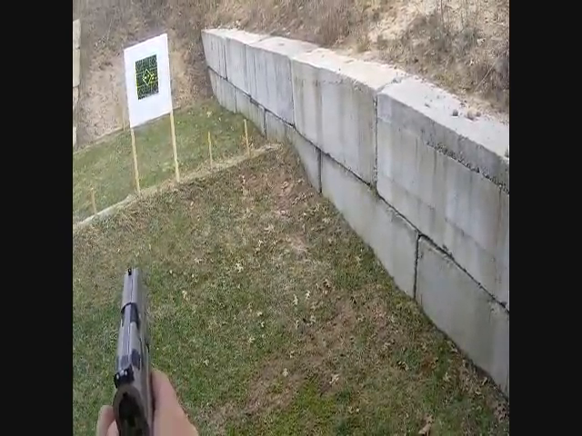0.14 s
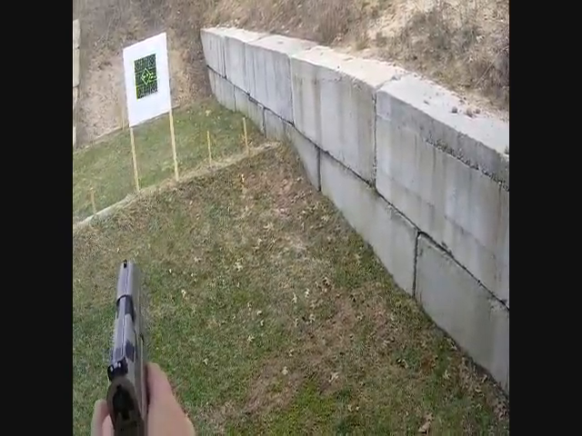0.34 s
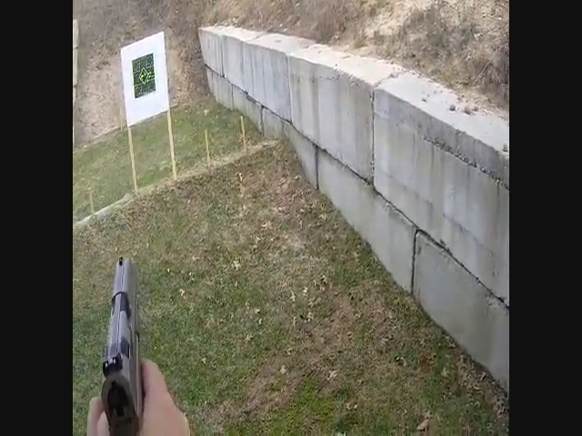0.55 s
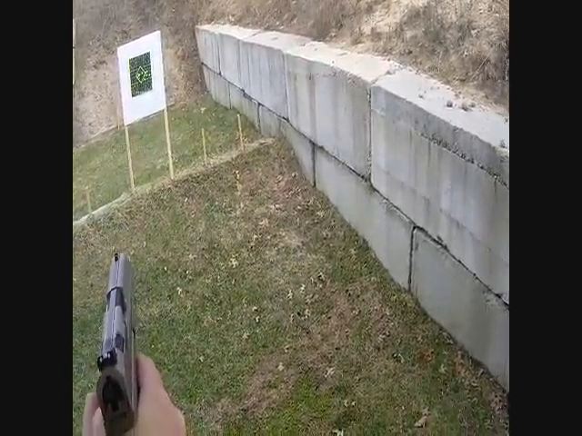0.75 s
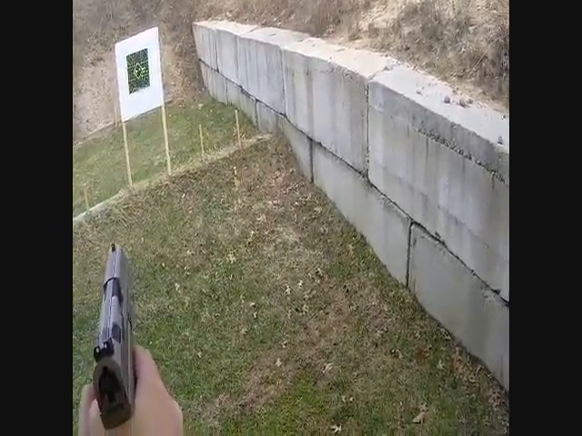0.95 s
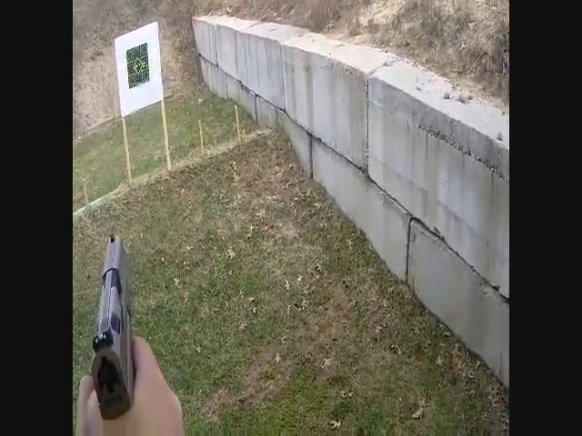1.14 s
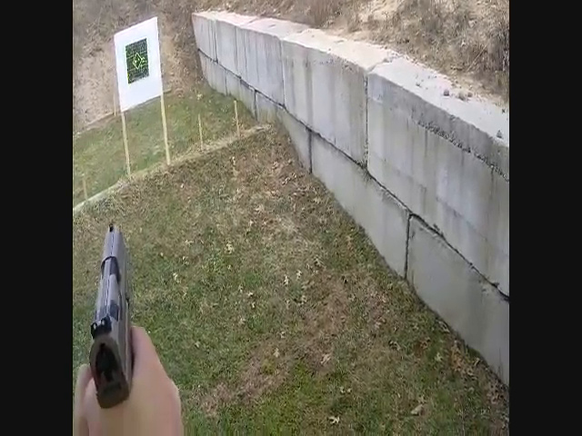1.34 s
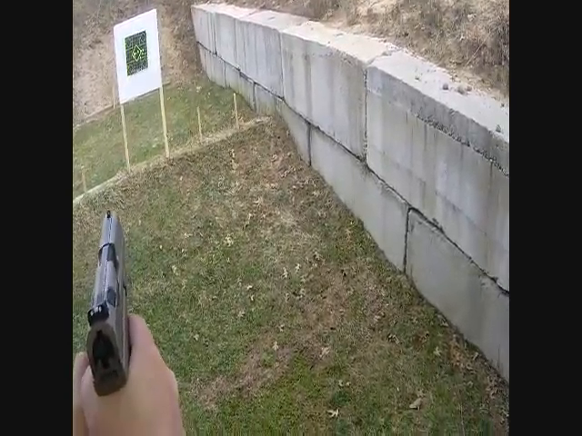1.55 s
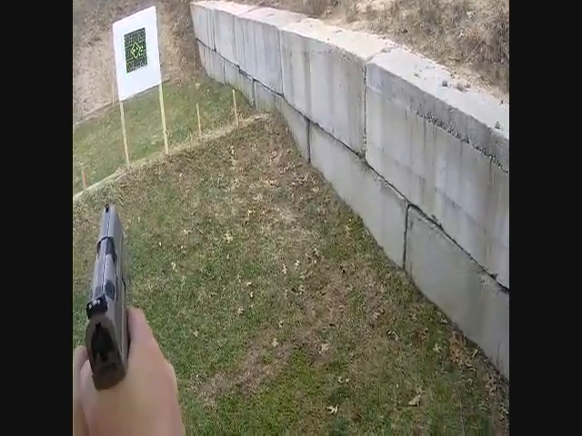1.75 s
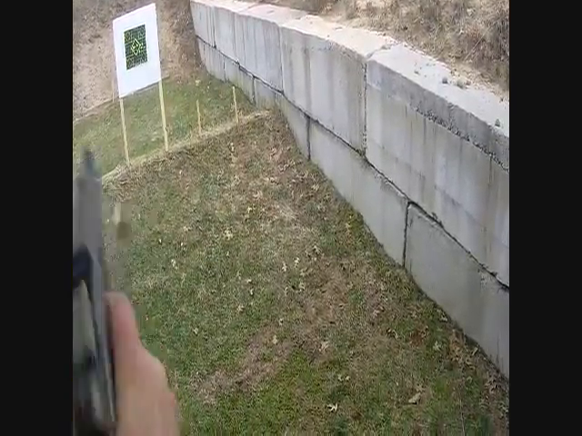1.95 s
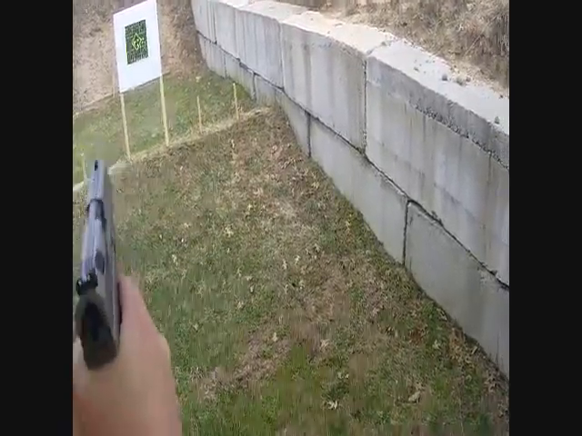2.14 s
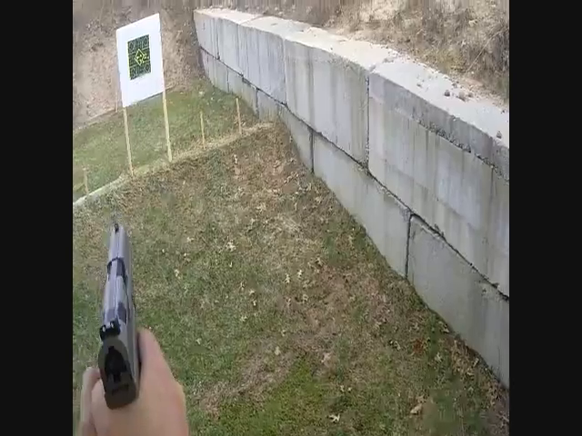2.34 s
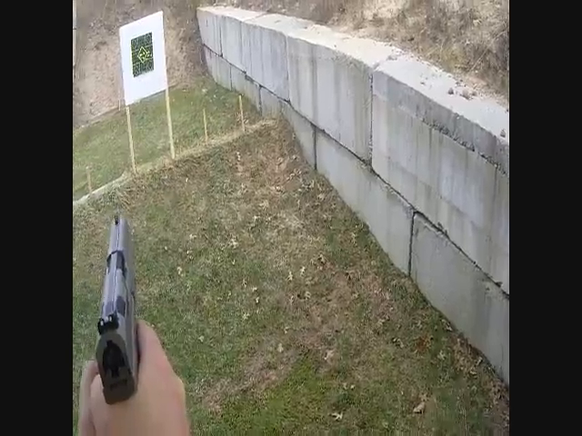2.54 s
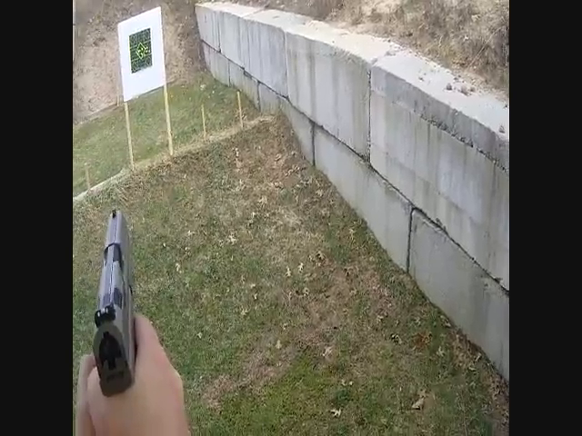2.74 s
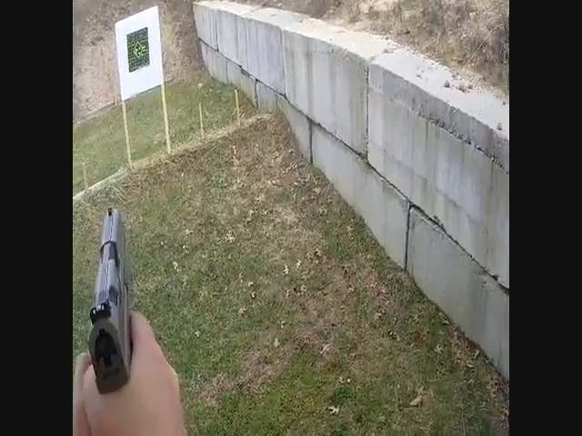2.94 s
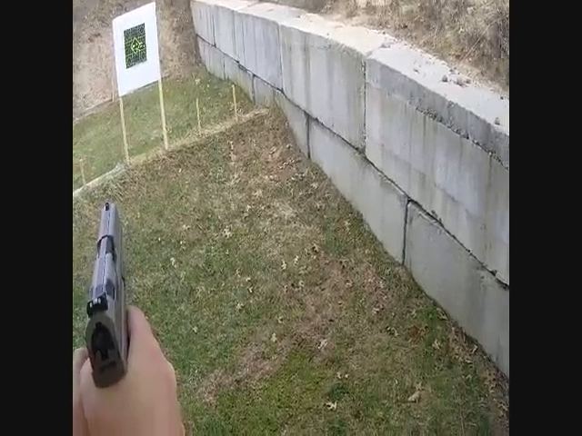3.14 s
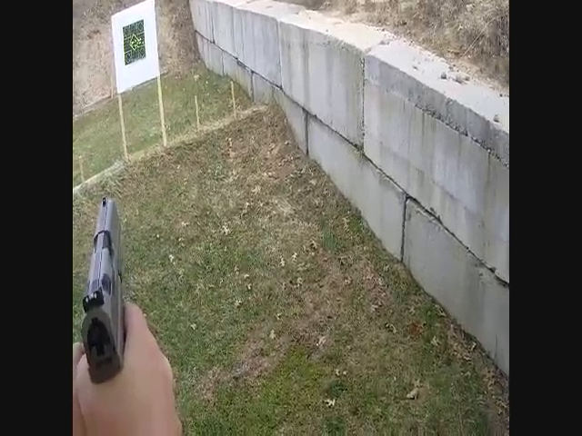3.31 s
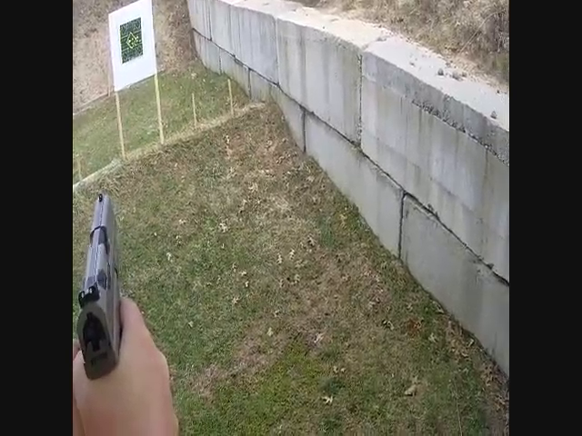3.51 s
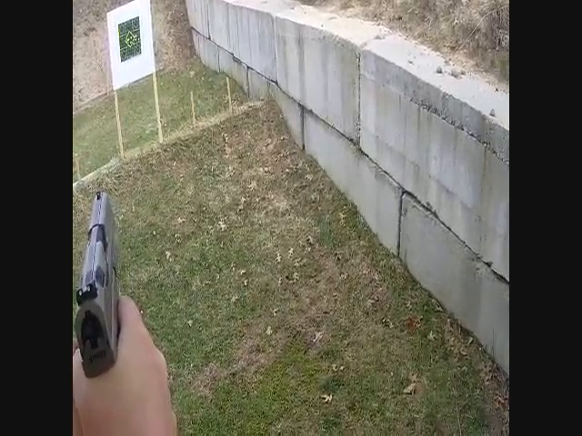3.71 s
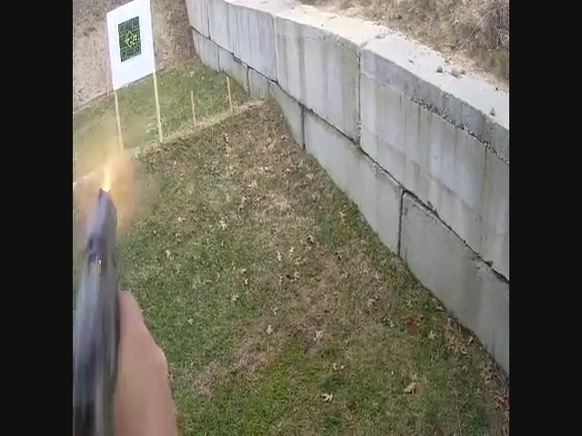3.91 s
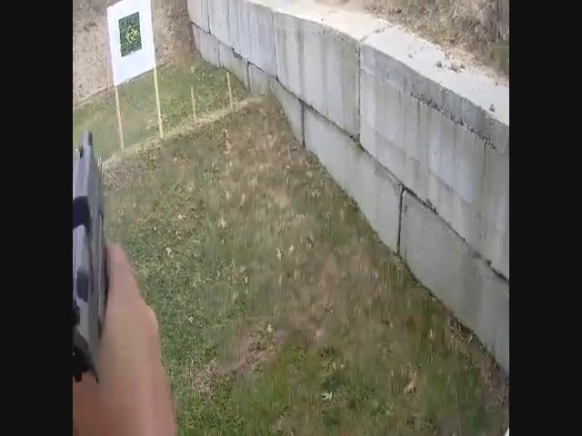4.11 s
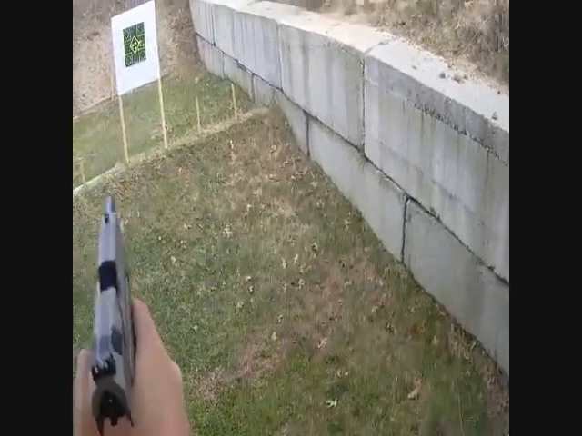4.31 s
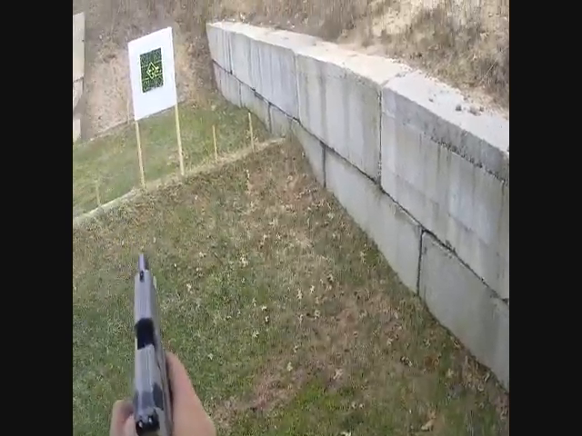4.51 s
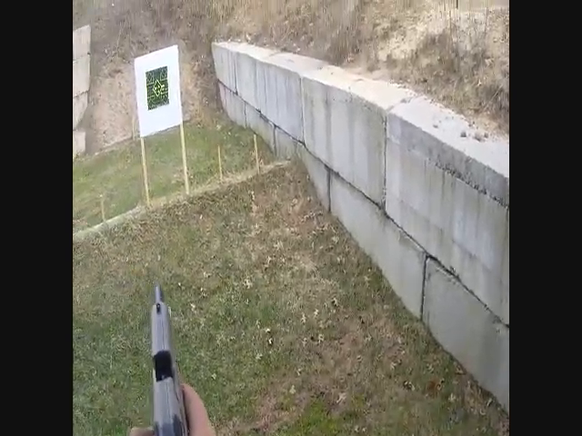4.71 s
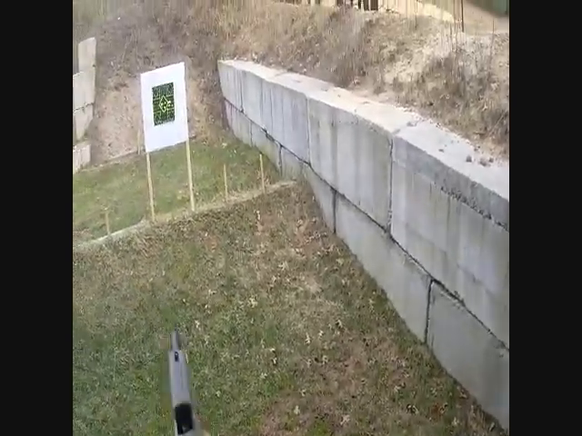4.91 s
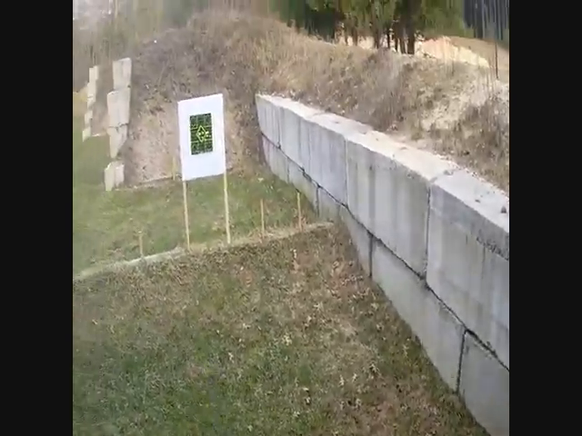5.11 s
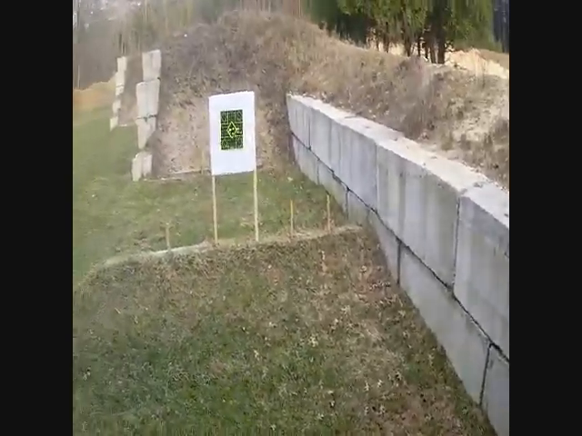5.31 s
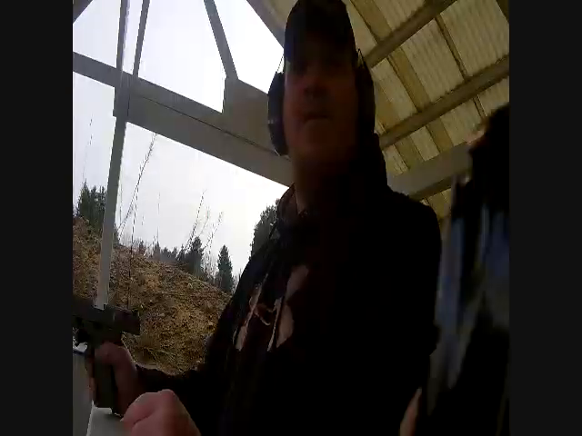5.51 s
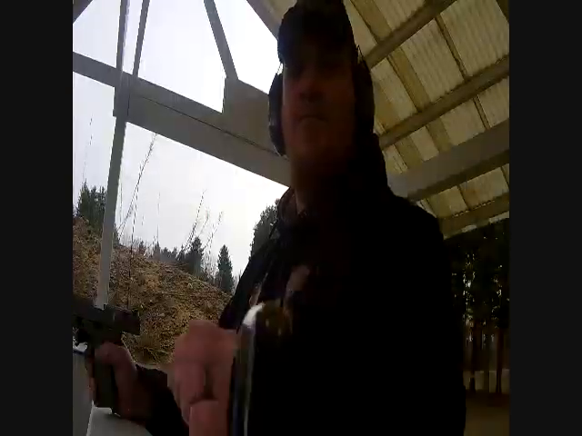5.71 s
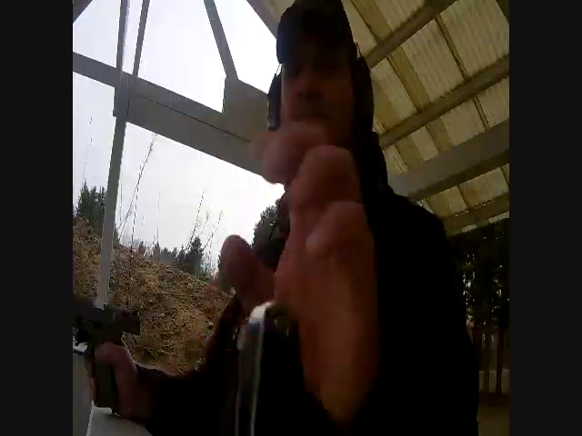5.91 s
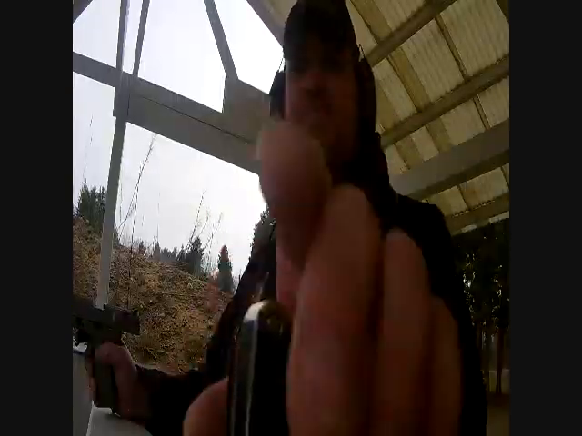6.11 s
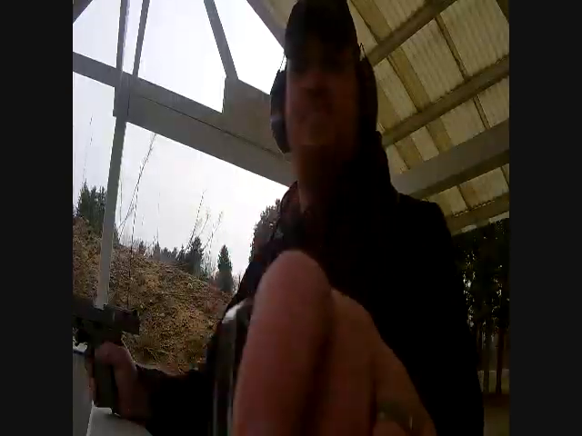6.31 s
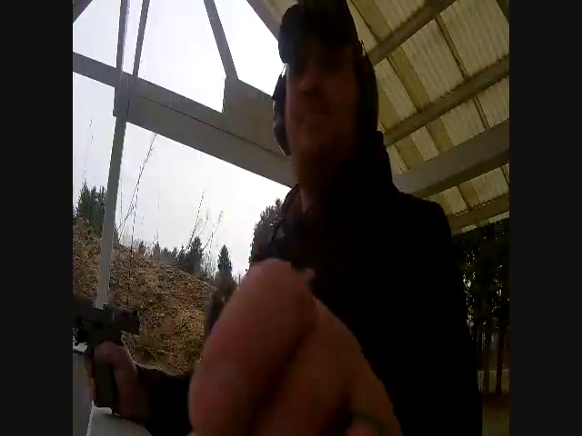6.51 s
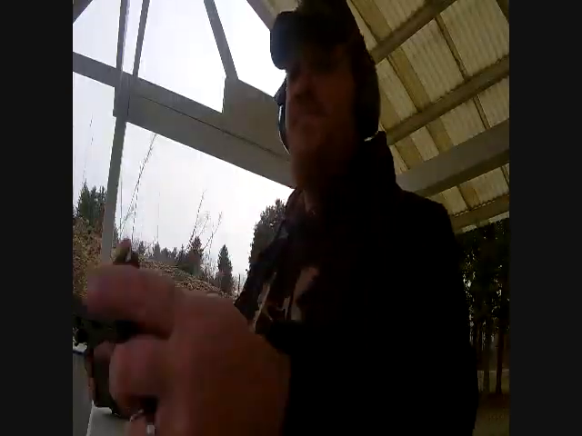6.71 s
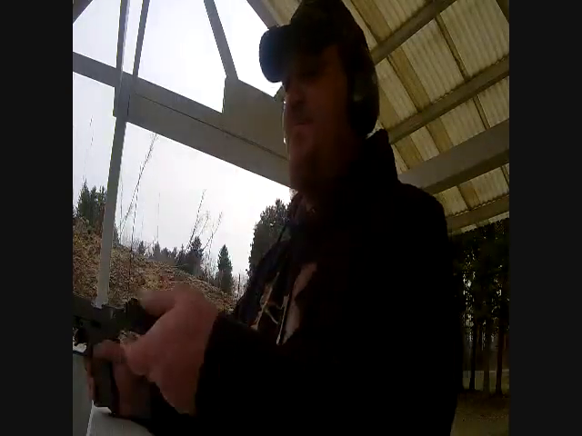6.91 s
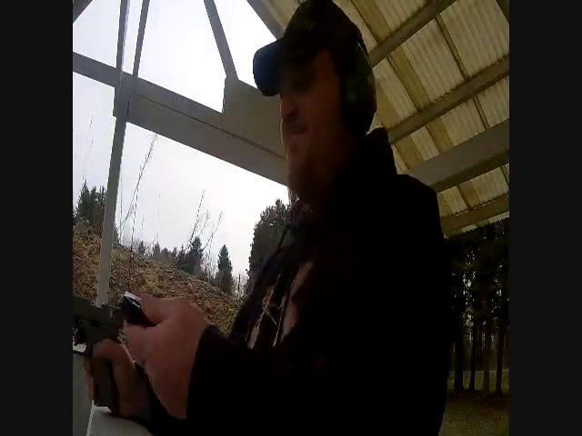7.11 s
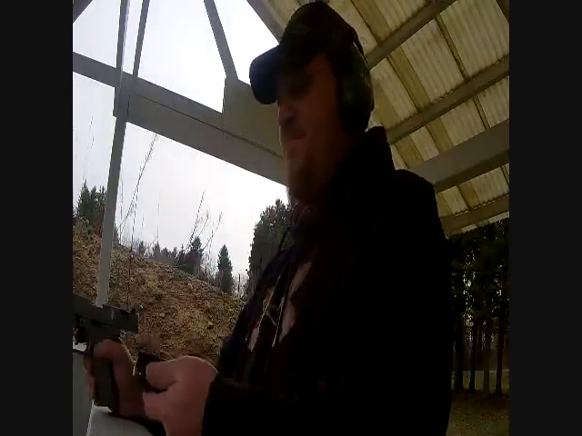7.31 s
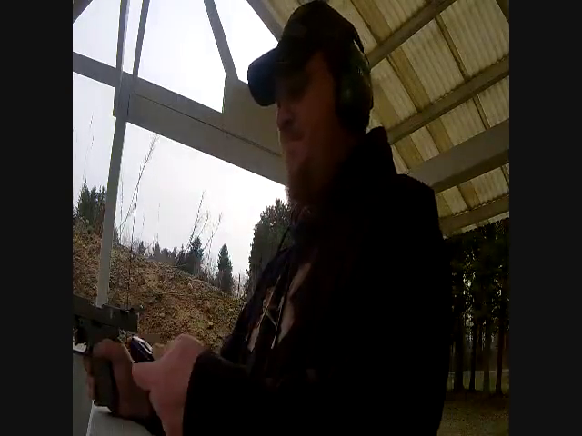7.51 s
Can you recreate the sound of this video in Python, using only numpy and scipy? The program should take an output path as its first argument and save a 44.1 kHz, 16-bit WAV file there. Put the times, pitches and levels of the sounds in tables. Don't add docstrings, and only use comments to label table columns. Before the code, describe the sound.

Steady dull microphone hiss, then a very loud pistol shot, flattened by overload, rattling with boxy ringing between concrete walls and leaving a longer tail off distant banks. A second, near-identical shot follows two seconds later. A spent case tinkles faintly after each. Tiny metal clinks, a sudden close thump through the camera mount, and brief muffled cloth rubs follow before only hiss remains.

```python
import sys
import numpy as np
from scipy import signal
from scipy.fft import rfft, irfft, next_fast_len
from scipy.io import wavfile
from scipy.ndimage import uniform_filter1d, map_coordinates

SR = 44100
rng = np.random.default_rng(int(sys.argv[2]) if len(sys.argv) > 2 else 0)


def bounce(signal):
    frames = np.transpose(np.atleast_2d(signal))
    limited = np.clip(frames, -1, 1)
    pcm = np.round(limited * 32767).astype(np.int16)
    wavfile.write(sys.argv[1], SR, pcm)


def volts_from_db(level):
    exponent = np.asarray(level, float) / 20
    return 10 ** exponent


N = 332955

# start in seconds, blast level in dB.
SHOTS = [
    (2.0279, -3),
    (4.0238, -2.5),
]
# frequency in Hz, time to fall 60 dB in seconds.
NEAR_DECAY = [(100, 0.23), (550, .23), (800, 0.31), (1300, 0.325), (3500, 0.29), (7000, 0.26),
              (15000, 0.18)]
# frequency in Hz, time to fall 60 dB in seconds.
FAR_DECAY = [(100, 1.), (600, 3.3), (1300, 2), (3500, 1.5), (7000, 0.87), (15000, 0.36)]
# frequency in Hz, level in dB.
NEAR_COLOUR = [(25, -2), (150, -4), (600, -5.5), (850, -1.5), (1300, -5), (1900, -4), (2300, -5), (2800, 1),
               (4400, -0.5), (5000, -8.5), (7000, -5.5), (7600, -9.5), (16000, -18.5)]
# frequency in Hz, level in dB.
FAR_COLOUR = [(25, -7.5), (600, -5), (1000, -4.5), (1300, -0.4), (1900, 2.5), (2400, 3), (2800, 4),
              (4500, 3), (5000, -3.5), (7000, -2), (9000, -5), (16000, -17)]
# frequency in Hz, likeness from 0 to 1.
LIKENESS = [(100, .8), (1300, .96), (3000, .7), (7000, .35), (16000, .2)]
# delay after the shot in seconds, level in dB.
SLAPS = [
    (.099, -14),
    (.212, -31),
    (.225, -34),
]
# first path in m, round trip in m, first level in dB, loss per trip in dB.
ROOF_PATH = (2.4, 2.7, 14, .4)
# first path in m, round trip in m, first level in dB, loss per trip in dB.
WALL_PATH = (32, 10.5, -5, 5.8)
# frequency in Hz, width in Hz, level in dB.
HOUSING = [(1095, 32, 9), (1314, 80, 22), (1655, 100, 10), (2650, 180, -2.5), (3040, 160, -0.5),
           (3400, 260, -3.5), (4120, 180, -1.5), (6910, 500, -4), (8440, 400, -2)]
# start in seconds, ring level in dB, tick level in dB.
KNOCKS = [
    (5.747, -28.5, -62),
    (5.7512, -18, -54),
    (5.7572, -21.5, -49),
    (5.772, -31.5, -70),
]
# frequency in Hz, level in dB, time to fall 60 dB in seconds.
MOUNT = [(44, -16, 0.2), (164, 0, 0.042), (267, 0, 0.026), (690, -5, 0.032), (1210, -4.5, 0.028),
         (1650, -13, 0.036), (2680, -24, 0.021), (4160, -27, 0.019), (8700, -28, 0.014)]
# wall ring in Hz, mouth tone in Hz, then its bounces,
# each with start in seconds, ring spread in Hz, ring level in dB, floor click level in dB.
CASES = [
    (10960, 5280, [(2.849, 200, -62, -60), (3.14, 150, -79, -65), (3.6, 30, -76, -85)]),
    (10740, 4400, [(4.853, 280, -62, -53), (5.024, 60, -66, -57.5)]),
]
# share of the ring spread, level in dB.
BRASS = [(-.5, 4), (.1, 0), (.5, 4.5)]
# frequency in Hz, sharpness (Q), level in dB.
FLOOR = [(3500, 2.5, 1.5), (4500, 4, -1.5), (5300, 4, -1.5)]
# start in seconds, frequency in Hz, level in dB, time to fall 60 dB in seconds.
PARTS = [
    (5.416, 10780, -61, .13),
    (5.418, 13010, -68, .1),
    (5.48, 3950, -62, .1),
    (5.537, 3150, -57, .13),
    (5.578, 4300, -58, .11),
    (5.575, 8700, -66, .15),
    (5.6, 9000, -65, .12),
    (5.6, 3080, -58, .13),
]
# start in seconds, held time in seconds, level in dB.
STROKES = [
    (5.58, .01, -58),
    (5.775, .045, -50),
    (5.86, .03, -52),
    (6.0, .04, -62),
    (6.38, .12, -63),
    (6.52, .13, -59),
]
# frequency in Hz, level in dB.
CLOTH = [(200, -30), (900, -7.5), (1400, 3), (1900, -11), (3000, -26), (16000, -49.5)]
# frequency in Hz, level in dB per Hz.
HISS = [(12, -32.5), (20, -1), (319, -1.5), (347, -1), (377, -3), (527, -5), (1330, -14), (1810, -17),
        (3250, -24), (14700, -35.5), (16000, -35.5)]
# frequency in Hz, level in dB.
GRIT = [(100, -5), (1300, 0), (4000, -0.5), (8000, -5.5), (16000, -14.5)]
# frequency in Hz, level in dB.
BAND_EDGE = [(15700, 0), (15830, -8), (15950, -46), (17050, -58), (17200, -120)]

SOUND_M_PER_S = 343
OVERLOAD_LEVEL = .51


def unit(x):
    return x / np.sqrt(np.mean(x ** 2) + 1e-20)


def along(points, hz):
    f, v = np.transpose(points)
    return np.interp(np.log(hz + 1), np.log(f + 1), v)


def filtered(x, response):
    m = next_fast_len(N + SR // 2)
    return irfft(rfft(x, m) * response(np.fft.rfftfreq(m, 1 / SR)), m)[:N]


def coloured_noise(colour):
    return unit(filtered(rng.standard_normal(N), lambda hz: volts_from_db(along(colour, hz))))


def bandpass(x, low_hz, high_hz):
    return signal.sosfilt(signal.butter(3, [low_hz, high_hz], "bandpass", fs=SR, output="sos"), x)


def resonance(x, hz, q):
    peak = signal.iirpeak(hz, q, SR)
    return unit(signal.lfilter(*peak, signal.lfilter(*peak, x)))


def ring(hz, db, t60, attack=0.00077):
    t = np.arange(SR // 2) / SR
    return volts_from_db(db - 60 * t / t60) * (1 - np.exp(-t / attack)) * np.sin(2 * np.pi * hz * t)


def add(track, s, sound):
    part = track[round(s * SR):][:len(sound)]
    part += sound[:len(part)]


def shots():
    out, t = np.zeros(N), np.arange(2 * SR) / SR
    walls, banks = rng.standard_normal((2, len(t)))
    u = t[:SR // 100] / 0.00022
    blast = bandpass((1 - u) * np.exp(-u), 950, 2000)
    swell, singles = echo_swell(t), returns()
    lead_s, lead_db = .0027, -33
    for s, db in SHOTS:
        noise = rng.standard_normal(len(t))
        crack = volts_from_db(15.5 - 60 * t / .02) * signal.lfilter(*signal.iirpeak(4000, .7, SR), noise)
        near = volts_from_db(9.5) * echoes(walls, NEAR_DECAY, NEAR_COLOUR) * (1 - np.exp(-t / 0.003))
        far = volts_from_db(-31.5) * echoes(banks, FAR_DECAY, FAR_COLOUR)
        add(out, s, volts_from_db(db) * (crack + swell * (near + far)))
        add(out, s - lead_s, volts_from_db(db + lead_db) * crack[:round(lead_s * SR)][::-1])
        for late, level in singles:
            add(out, s + abs(late), volts_from_db(db + level) * blast)
        slap = bandpass(crack, 1800, 4800)
        for late, level in SLAPS:
            add(out, s + late, volts_from_db(db + level - 16.0) * slap)
    return out


def echo_swell(t):
    path_m = t * SOUND_M_PER_S
    flutter_db = 1.8 * np.cos(2 * np.pi * (path_m - WALL_PATH[0]) / WALL_PATH[1])
    berm_m, berm_depth_m = 74, 9
    berm_db = 3 * np.exp(-((path_m - berm_m) / berm_depth_m) ** 2)
    return volts_from_db(flutter_db + berm_db)


def returns():
    roof = trips(ROOF_PATH, count=9)
    walls = np.repeat(trips(WALL_PATH, count=9), 4, axis=0)
    both = np.vstack([roof, walls])
    rough_m, rough_db = 2.2, 2.2
    return both + rng.uniform(-1, 1, both.shape) * [rough_m / SOUND_M_PER_S, rough_db]


def trips(path, count):
    first_m, round_m, db, loss_db = path
    k = np.arange(count)
    return np.transpose([(first_m + round_m * k) / SOUND_M_PER_S, db - loss_db * k])


def echoes(place, decay, colour):
    fresh = rng.standard_normal(len(place))
    hz, t, z = signal.stft(np.array([place, fresh]), SR, nperseg=256)
    same = along(LIKENESS, hz)[:, None]
    db = along(colour, hz)[:, None] - 60 * t / along(decay, hz)[:, None]
    mixed = same * z[0] + np.sqrt(1 - same ** 2) * z[1]
    return signal.istft(mixed * volts_from_db(db), SR, nperseg=256)[1][:len(place)]


def housing(hz):
    return 1 + sum(volts_from_db(db) * 1j * hz * w / (c * c - hz * hz + 1j * hz * w) for c, w, db in HOUSING)


def knock():
    out, t = np.zeros(N), np.arange(SR // 20) / SR
    for k, (s, db, tick_db) in enumerate(KNOCKS):
        push = (-1) ** k
        add(out, s, push * sum(ring(hz, db + level, t60) for hz, level, t60 in MOUNT))
        add(out, s, volts_from_db(tick_db - 60 * t / 0.028) * rng.standard_normal(len(t)))
    return out


def cases():
    out, t = np.zeros(N), np.arange(SR // 10) / SR
    brass_t60, click_t60, tick_t60 = .26, 0.14, .012
    for hz, mouth_hz, bounces in CASES:
        for s, spread_hz, db, click_db in bounces:
            for side, level in BRASS:
                add(out, s, ring(hz + spread_hz * side, db + level, brass_t60, attack=0.0022))
            noise = rng.standard_normal(len(t))
            mouth = resonance(noise, mouth_hz, 11)
            slab = sum(volts_from_db(level) * resonance(noise, c, q) for c, q, level in FLOOR)
            add(out, s, volts_from_db(click_db - 60 * t / click_t60) * unit(mouth + slab))
            add(out, s, volts_from_db(click_db - 4.5 - 60 * t / tick_t60) * noise)
    return out


def pistol_parts():
    out = np.zeros(N)
    for s, hz, db, t60 in PARTS:
        for shift_hz, level in [(0, 0), (90, -3), (-130, -6)]:
            add(out, s, ring(hz + shift_hz, db + level, t60, attack=.006))
    return out


def sleeve():
    clumps_per_s = 60
    points = rng.standard_normal(int(N * clumps_per_s / SR) + 4)
    clumps = map_coordinates(points, [np.arange(N) * clumps_per_s / SR])
    rub = volts_from_db(2 * clumps) * rng.standard_normal(N)
    rub = filtered(rub, lambda hz: volts_from_db(along(CLOTH, hz)) * np.sqrt(housing(hz)))
    t, strokes = np.arange(N) / SR, np.zeros(N)
    for s, held, db in STROKES:
        rise_db = 400 * np.minimum(t - s, 0)
        fall_db = 200 * np.maximum(t - s - held, 0)
        strokes += volts_from_db(db + rise_db - fall_db)
    return unit(rub) * strokes


def scene():
    return (filtered(shots(), housing) + knock() + cases() + pistol_parts() + sleeve())[None]


def overload(x):
    return x / (1 + np.abs(x / OVERLOAD_LEVEL) ** 8) ** (1 / 8)


def blast_grit(x):
    power = uniform_filter1d(uniform_filter1d(x ** 2, size=170), size=170)
    return volts_from_db(-2) * np.abs(power) ** 1.4 * coloured_noise(GRIT)


def microphone_hiss():
    return volts_from_db(-52) * coloured_noise(HISS)


def low_pass(x):
    return signal.sosfilt(signal.butter(12, 17090, fs=SR, output="sos"), x)


def record(dry):
    clipped = overload(dry[0] + microphone_hiss())
    rough = clipped + blast_grit(clipped)
    mix = filtered(rough, lambda hz: volts_from_db(along(BAND_EDGE, hz)))[None]
    return low_pass(mix)


dry = scene()
out = record(dry)
bounce(out)
```